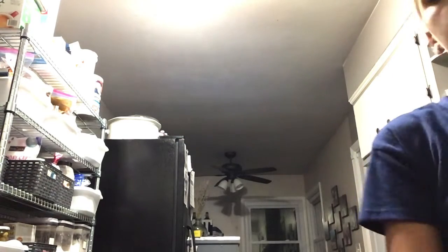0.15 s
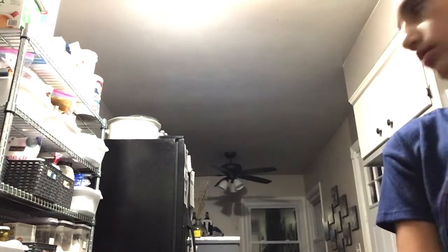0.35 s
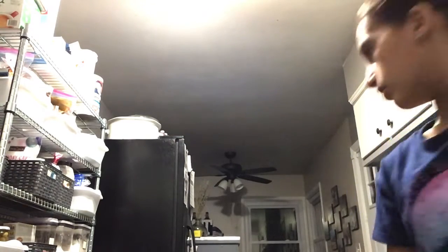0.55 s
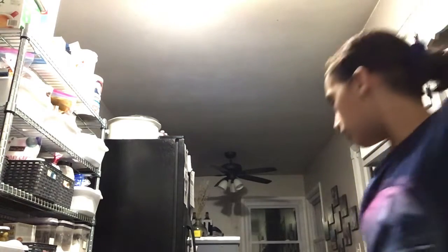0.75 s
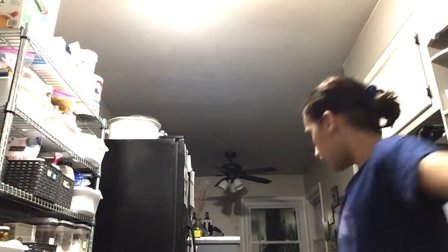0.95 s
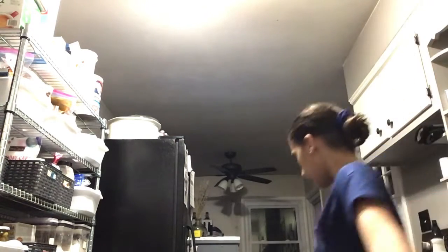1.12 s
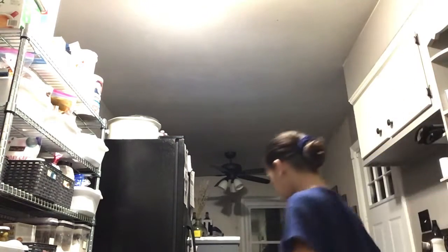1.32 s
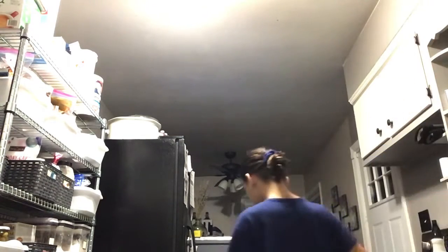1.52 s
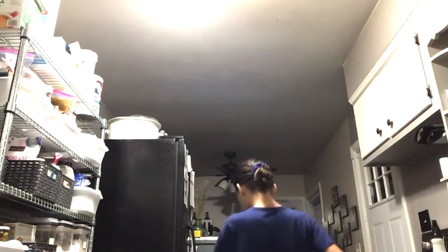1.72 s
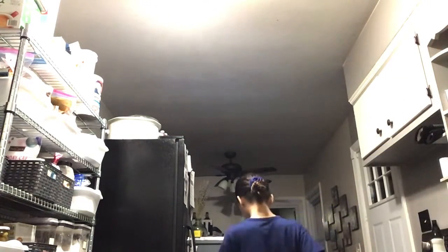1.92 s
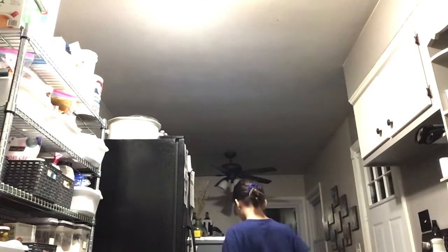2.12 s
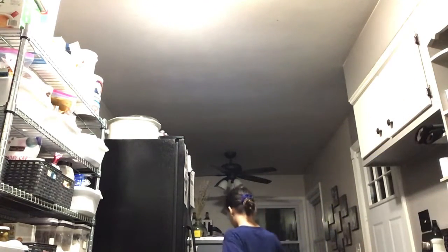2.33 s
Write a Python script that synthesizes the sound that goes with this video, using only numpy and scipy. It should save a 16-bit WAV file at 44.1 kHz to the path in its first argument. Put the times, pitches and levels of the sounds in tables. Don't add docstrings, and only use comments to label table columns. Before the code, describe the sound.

Two hard, boomy knocks very close to the microphone, slightly overloaded, with quick bounces and a brief scrape; then three dull footsteps with faint shelf rattles, a lighter step and a small bright snap over low refrigerator hum.

```python
import sys
import numpy as np
from scipy import signal
from scipy.fft import rfft, irfft
from scipy.io import wavfile

SR = 44100
rng = np.random.default_rng(int(sys.argv[2]) if len(sys.argv) > 2 else 0)


def dump(signal):
    limited = np.clip(np.atleast_2d(signal).T, -1, 1)
    pcm = np.round(limited * 32767).astype(np.int16)
    wavfile.write(sys.argv[1], SR, pcm)


def voltage_ratio(level):
    return 10 ** (np.asarray(level, float) / 20)


N = 105840


def read(points, hz):
    f, value = np.transpose(points)
    return np.interp(np.log(hz + 1), np.log(f + 1), value)


def evened(x):
    return x / np.sqrt(np.mean(x ** 2) + 1e-20)


def add(mix, s, sound):
    part = mix[round(s * SR):][:len(sound)]
    part += sound[:len(part)]


def coloured(x, db_of_hz):
    gain = voltage_ratio(db_of_hz(np.fft.rfftfreq(len(x), 1 / SR)))
    return irfft(rfft(x) * gain, len(x))


# (frequency [Hz], level [dB])
AIR_TONE = [(25, -43), (87, 1), (140, -7), (260, -17), (700, -31), (1300, -43), (3000, -51), (16000, -66)]
# (pitch [Hz], width [Hz], level [dB])
HUM = [(58, 12, -57), (84.4, 14, -49), (111, 13, -58), (149, 14, -63.5), (202.8, 2.7, -53.5),
       (350, 22, -59), (3810, 250, -85.5), (15100, 60, -90.5)]


def kitchen():
    air_db, hiss_db, hiss_edge_hz = -45.5, -76.5, 15550
    air = evened(coloured(rng.standard_normal(N), lambda f: read(AIR_TONE, f)))
    out = voltage_ratio(air_db) * air + voltage_ratio(hiss_db) * rng.standard_normal(N)
    for hz, width, db in HUM:
        drone = coloured(rng.standard_normal(N), lambda f: -20 * np.log10(1 + (2 * (f - hz) / width) ** 2))
        out = out + voltage_ratio(db) * evened(drone)
    return coloured(out, lambda f: -np.clip((f - hiss_edge_hz) / 20, 0, 40))


# (frequency [Hz], level [dB])
GRIT_TONE = [(800, -10), (2200, 3), (5000, -6), (8000, -15.5), (16000, -24.5)]


def grit(strength):
    return evened(coloured(rng.standard_normal(SR // 5), lambda f: read(GRIT_TONE, f) * strength))


# (time [s], level [dB], length [s])
SCUFFS = [
    (.2, -66, .04),
    (1.74, -70, 0.073),
]


def scuffs():
    out, t = np.zeros(N), np.arange(SR // 5) / SR
    for s, db, length in SCUFFS:
        add(out, s, voltage_ratio(db) * np.sin(np.pi * np.minimum(t / length, 1)) * grit(0.5))
    return out


def swells(events):
    out = np.zeros(N)
    for s, db, hz, length in events:
        t = np.arange(0, length, 1 / SR)
        add(out, s, voltage_ratio(db) * np.sin(np.pi * t / length) ** 2 * np.sin(2 * np.pi * hz * t))
    return out


# (time [s], level [dB], pitch [Hz], length [s])
THUDS = [
    (.224, -48, 2490, 0.022),
    (.243, -13, 105.3, 0.047),
    (.25, -16, 283.6, 0.023),
    (.372, -23.5, 1341, 0.015),
    (.376, -20.5, 280, 0.065),
    (1.0, -32, 168, 0.046),
    (1.45, -36.5, 172.7, 0.048),
    (1.761, -26.5, 63.5, 0.076),
]


def board_thuds():
    return swells(THUDS)


def blow(bass_db, treble_db, ring, tone, modes, modes_db, lag_s, lag_power, t60_s, t60_power):
    count, lag_scatter = 200, 0.6
    t = np.arange(SR // 4) / SR
    detune, phase, scatter = rng.random((3, count + len(modes)))
    crowd = np.geomspace(60, 16000, count) * (1 + 0.032 * detune[:count])
    crowd_t60 = t60_s * (100 / crowd) ** t60_power
    crowd_db = read(tone, crowd) + 10 * np.log10(crowd / crowd_t60) - 52
    strong_hz, strong_db, strong_t60 = np.transpose(modes)
    hz = np.append(crowd, strong_hz)
    t60 = ring * np.append(crowd_t60, strong_t60)[:, None]
    db = np.append(crowd_db, strong_db + modes_db)
    db += bass_db * np.maximum(np.log2(500 / hz), 0)
    db += treble_db * np.maximum(np.log2(hz / 1000), 0)
    lag = (lag_s * (100 / hz) ** lag_power * (1 + lag_scatter * (2 * scatter - 1)))[:, None]
    swell = np.sin(np.pi / 2 * np.minimum(t / lag, 1)) ** 2
    decay = voltage_ratio(-60 * np.maximum(t - lag, 0) / t60)
    tones = np.sin(2 * np.pi * (hz[:, None] * t + phase[:, None]))
    return voltage_ratio(db) @ (swell * decay * tones)


# (time [s], peak level [dB], bass tilt [dB/octave], treble tilt [dB/octave], ring factor [ratio])
KNOCKS = [
    (.236, 5.5, -2.96, 1.97, 0.8),
    (0.365, -15, 0.93, -0.3, 1.1),
    (.374, 2.5, -4.5, -0.36, 0.87),
    (.413, -12.5, 0.45, -1.5, 0.97),
    (.427, -11, -0.76, -3, 1.3),
    (0.475, -20, 0.27, 1, 1),
]
# (frequency [Hz], level [dB])
KNOCK_TONE = [(50, -6.5), (100, 7.5), (290, 3), (750, -7), (950, -14.5), (2500, -24), (6000, -50),
              (16000, -67.5)]
# (pitch [Hz], level [dB], t60 [s])
KNOCK_MODES = [(105, -35.5, 0.11), (177.2, -24, 0.42), (287.8, -22, 0.26), (353, -21.5, 0.25),
               (456, -19, .12), (559.5, -30, 0.42), (690, -33.5, .09), (807, -25, .08), (1050, -30, 0.15),
               (1318, -31.5, 0.1), (1780, -40, 0.11), (2510, -26, 0.033)]


def knocks():
    out = np.zeros(N)
    for s, db, bass_db, treble_db, ring in KNOCKS:
        hit = blow(bass_db, treble_db, ring, KNOCK_TONE, KNOCK_MODES, modes_db=5.5,
                   lag_s=0.016, lag_power=0.98, t60_s=0.23, t60_power=0.49)
        add(out, s, voltage_ratio(db - 7.5) * hit)
    return out


# (time [s], level [dB])
SLIDE = [
    (.4, -53),
    (.5, -52.5),
    (.55, -48.5),
    (0.599, -45.5),
    (0.649, -50.5),
    (.7, -70.5),
]
# (frequency [Hz], level [dB])
SLIDE_TONE = [(150, -12.5), (300, -6.5), (800, -20), (1400, -19), (2500, -28), (5000, -36.5), (8000, -47),
              (16000, -55)]
# (pitch [Hz], width [Hz], level [dB], unused here: all humps are equal)
SLIDE_PEAKS = [(312, 46, 0), (1170, 110, -11), (1390, 52, -10), (1850, 55, -19), (2490, 52, -23),
               (4560, 49, -30), (7770, 230, -38), (10700, 67, -43)]


def slide():
    slips_per_s, slip_spread_db, peak_db, slide_db = 3700, 2, 13.5, 6.5

    def tone(f):
        humps = sum(1 / (1 + (2 * (f - hz) / width) ** 2) for hz, width, _ in SLIDE_PEAKS)
        return read(SLIDE_TONE, f) + peak_db * humps

    rub = rng.standard_normal(N)
    slipping = rng.random(N) < slips_per_s / SR
    force = 0.2 + slipping * voltage_ratio(slip_spread_db * rng.exponential(1, N))
    body = evened(coloured(rub * force, tone))
    s, db = np.transpose(SLIDE)
    t = np.arange(N) / SR
    fade = np.interp(t, [s[0], s[0] + 0.03, s[-1], s[-1] + 0.016], [0, 1, 1, 0])
    return body * voltage_ratio(slide_db + np.interp(t, s, db)) * fade


# (time [s], peak level [dB])
RATTLES = [
    (0.5531, -60.5),
    (1.0026, -58.5),
    (1.052, -62),
    (1.492, -54.5),
    (1.516, -65),
    (1.8567, -53.5),
    (1.8781, -66),
]
# (pitch [Hz], level [dB], t60 [s])
RATTLE_MODES = [(2450, 0, .05), (3700, -8, .04), (5200, 0, .08), (6100, -7, .04), (7500, -3, .06),
                (11200, -7, .03)]


def rattles():
    rattle_db, grit_t60_s = -3.5, 0.21
    out, t = np.zeros(N), np.arange(SR // 5) / SR
    for s, peak_db in RATTLES:
        ring = np.zeros(len(t))
        for hz, db, t60 in RATTLE_MODES:
            louder, sharper = rng.standard_normal(2)
            tone = np.sin(2 * np.pi * hz * (1 + sharper / 100) * t)
            ring += voltage_ratio(db + 2.2 * louder - 60 * t / t60) * tone
        shiver = voltage_ratio(-60 * t / grit_t60_s) * grit(1)
        add(out, s, voltage_ratio(peak_db + rattle_db) * (ring + shiver))
    return out


# (time [s], peak level [dB], bass tilt [dB/octave], treble tilt [dB/octave], ring factor [ratio])
STEPS = [
    (.994, -34, 2.1, -4.5, 0.72),
    (1.437, -34.5, -0.1, 2.84, 0.8),
    (1.799, -37, 0.3, 2.2, 0.86),
    (2.099, -49.5, 1.5, -3.5, 1.1),
]
# (frequency [Hz], level [dB])
STEP_TONE = [(50, -36), (120, -32), (200, -7), (700, -11.5), (1000, -25.5), (2800, -25.5), (3800, -43.5),
             (12000, -80)]
# (pitch [Hz], level [dB], t60 [s])
STEP_MODES = [(168.2, -16.5, 0.26), (280, -34.5, 0.71), (323.3, -32, 0.24), (346.9, -24, 0.28),
              (479.3, -28.5, 0.14), (542.6, -31.5, 0.19), (1332, -36.5, 0.14), (1830, -35, .12),
              (2365, -44, .12), (3107, -45, 0.088)]


def footsteps():
    out = np.zeros(N)
    for s, db, bass_db, treble_db, ring in STEPS:
        footfall = blow(bass_db, treble_db, ring, STEP_TONE, STEP_MODES, modes_db=6,
                        lag_s=0.043, lag_power=0.84, t60_s=0.28, t60_power=0.34)
        add(out, s, voltage_ratio(db + 13) * footfall)
    return out


# (time [s], level [dB], pitch [Hz], length [s])
BOOMS = [
    (1.008, -27.5, 86, .105),
    (1.455, -29, 86, .105),
    (1.84, -33, 90, .065),
]


def floor_booms():
    return swells(BOOMS)


# (time [s], peak level [dB])
SNAPS = [
    (1.1444, -53.5),
    (1.1757, -54),
    (1.2174, -62),
    (1.8385, -52),
    (2.1439, -25.5),
]
# (frequency [Hz], level [dB])
SNAP_TONE = [(1000, -34.5), (3000, -23.5), (5000, -4), (8000, -6), (13500, 7), (16500, -3.5)]
# (frequency [Hz], level [dB])
SNAP_TAIL = [(1000, -6), (2800, 8), (4000, -6.5), (8000, -2.5), (13000, -5), (16500, -2)]


def snaps():
    echo_gap_s, echo_gain = 0.00036, -0.7
    snap_db, tail_db, tail_t60_s, tail_rise_s = 2, -26.5, 0.12, 0.0014
    out, click, t = np.zeros(N), np.zeros(512), np.arange(SR // 5) / SR
    click[256] = 1
    click[256 + round(echo_gap_s * SR)] = echo_gain
    crack = coloured(click, lambda f: read(SNAP_TONE, f))
    crack = crack / abs(crack).max()
    for s, db in SNAPS:
        tail = evened(coloured(rng.standard_normal(len(t)), lambda f: read(SNAP_TAIL, f)))
        shape = voltage_ratio(-60 * t / tail_t60_s) * np.minimum(t / tail_rise_s, 1)
        add(out, s - 256 / SR, voltage_ratio(db + snap_db) * crack)
        add(out, s, voltage_ratio(db + tail_db) * shape * tail)
    return out


# (frequency [Hz], t60 [s])
ROOM = [(100, .5), (500, 0.73), (2000, .4), (8000, 0.36), (16000, .2)]


def room(x):
    taps = np.zeros(SR // 2 + 400)
    at = np.arange(200, SR // 2, 20)
    taps[at + rng.integers(0, 20, len(at))] = rng.choice([-1., 1.], len(at))
    hz, t, bands = signal.stft(taps, SR, nperseg=256)
    decay = voltage_ratio(-60 * t / read(ROOM, hz)[:, None])
    tail = signal.istft(bands * decay, SR, nperseg=256)[1]
    return signal.fftconvolve(x, tail / np.linalg.norm(tail))[:N]


def scene():
    near_wet_db, far_wet_db = -16.5, -8
    background = kitchen()
    near = knocks()
    far = scuffs() + board_thuds() + rattles() + footsteps() + floor_booms() + snaps()
    reverb = room(voltage_ratio(near_wet_db) * near + voltage_ratio(far_wet_db) * far)
    return (near + far + reverb + slide() + background)[None]


def low_pass(x):
    return signal.sosfilt(signal.butter(12, 16830, fs=SR, output="sos"), x)


def record(dry):
    ceiling = 1.25
    mix = ceiling * np.tanh(dry / ceiling)
    return low_pass(mix)


dry = scene()
out = record(dry)
dump(out)
```